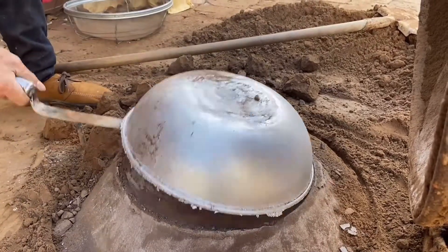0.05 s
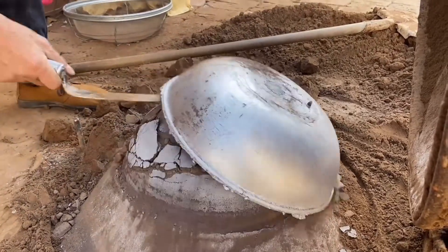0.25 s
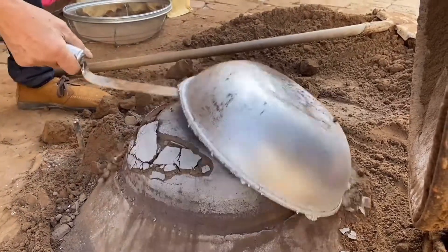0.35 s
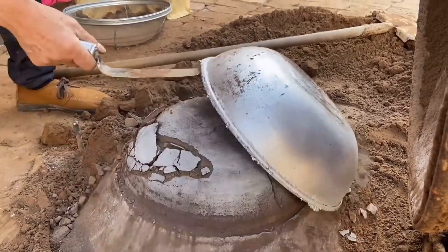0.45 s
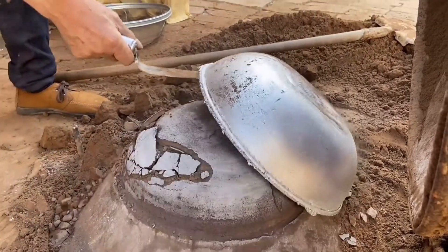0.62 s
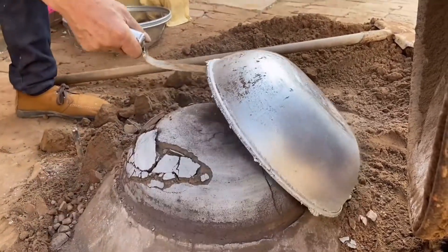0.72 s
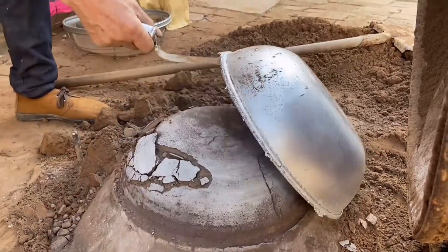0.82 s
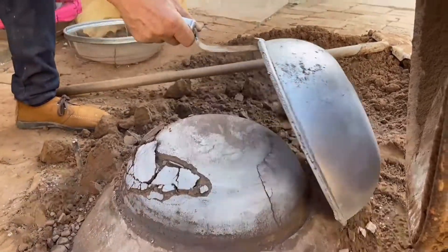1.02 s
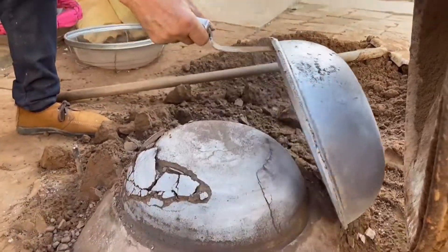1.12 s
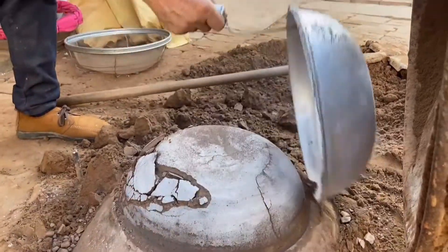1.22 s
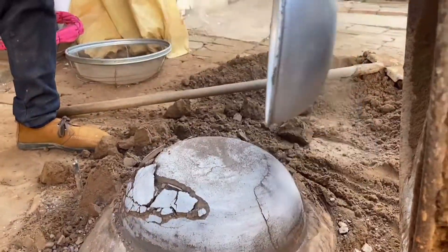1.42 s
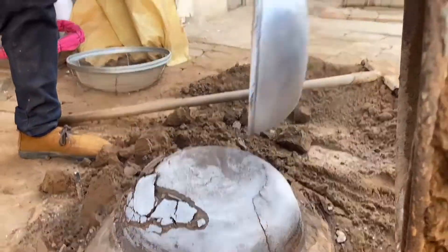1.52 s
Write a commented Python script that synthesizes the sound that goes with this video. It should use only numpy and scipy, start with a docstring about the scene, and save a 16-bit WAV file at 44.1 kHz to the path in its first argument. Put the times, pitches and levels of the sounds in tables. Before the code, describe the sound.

Metal scraping and one loud clank, then a pan grinds on grit and lifts, ringing briefly.

```python
"""Cast pan levered off its sand mould

A steel blade scrapes under the rim of a freshly cast metal pan, outdoors and close by. The pan tips
with one loud clank, knocks and grinds along the gritty mould, then lifts clear and rings more freely.
Blows and friction drive its modes; crushed sand clicks. Air buffets the microphone over a quiet yard."""
import sys
import numpy as np
from scipy import signal
from scipy.fft import rfft, irfft, next_fast_len
from scipy.io import wavfile
from scipy.ndimage import map_coordinates

SR = 44100
rng = np.random.default_rng(int(sys.argv[2]) if len(sys.argv) > 2 else 0)


def to_wav(s):
    """Save 16-bit WAV."""
    ch = np.atleast_2d(s).T  # columns
    pcm = np.round(np.clip(ch, -1, 1) * 32767)  # PCM
    wavfile.write(sys.argv[1], SR, pcm.astype(np.int16))


N = 68355

# main pan modes (frequency [Hz], level on mould [dB], t60 on mould [s], level lifted [dB])
PAN_MODES = [(326, -6, 0.25, 1), (417.7, -9.5, 0.23, -8), (471.4, -7, 0.063, -44), (812, -1, 0.079, -18),
             (958.6, 1.5, 0.32, -1), (1399.8, -6.5, 0.062, -3.5), (1892, 8, 0.077, -3),
             (2444, -7, 0.16, -5), (3074, 6, 0.07, -1.5), (3275, 8, 0.072, -7), (3450, 3, 0.18, -12),
             (3825, 3.5, 0.11, -25), (4610, 5, 0.065, -12), (5090, -5, 0.19, -21)]
# left-right likeness (frequency [Hz], correlation [-])
COHERENCE = [(60, 0.93), (500, 0.68), (950, 0.71), (1900, 0.13), (3300, 0.43), (5000, 0.52), (8000, 0.43),
             (12000, 0.65)]
RUB_SWELL_DB, RUB_SWELLS_PER_S = 3.5, 14
RING_PIVOT_HZ = 950


def amp(db):
    """Decibels to gain."""
    return 10 ** (np.asarray(db) / 20)


def unit(x):
    """Scale to rms 1."""
    return x / np.sqrt(np.mean(x ** 2) + 1e-20)


def along(points, hz):
    """Interpolate (frequency [Hz], value) points on a log axis."""
    f, v = np.transpose(points)
    return np.interp(np.log(hz + 1), np.log(f + 1), v)


def clock():
    """Sample times [s]."""
    return np.arange(N) / SR


def wobble(knots_per_s):
    """Smooth random curve."""
    knots = rng.standard_normal(int(N * knots_per_s / SR) + 4)
    return map_coordinates(knots, [clock() * knots_per_s])


def filtered(x, response):
    """Apply the gain response(hz)."""
    size = next_fast_len(N + SR // 2)
    return irfft(rfft(x, size) * response(np.fft.rfftfreq(size, 1 / SR)), size)[..., :N]


def stereo(pair, colour_db):
    """Two independent signals to coloured, partly coherent stereo, rms 1."""
    def response(hz):
        angle = np.arccos(np.clip(along(COHERENCE, hz), -1, 1)) / 2
        return amp(colour_db(hz)) * np.array([np.cos(angle), np.sin(angle)])
    mid, side = filtered(pair, response)
    return unit(np.array([mid + side, mid - side]))


def noise(spectrum):
    """Shaped stereo noise, rms 1."""
    return stereo(rng.standard_normal((2, N)), lambda hz: along(spectrum, hz))


def tone(hz, drift=0):
    """One mode, out of step between channels; drift is a fractional pitch bend."""
    apart_rad = np.arccos(np.clip(along(COHERENCE, hz), -1, 1)) * rng.choice([-1, 1])
    cycles = hz * (clock() + np.cumsum(drift) / SR) + rng.random()
    return np.sin(2 * np.pi * cycles + np.array([[apart_rad], [-apart_rad]]) / 2)


def struck(start_s, t60_s, attack_s=0.0009):
    """Impact envelope: fast attack, exponential decay."""
    age_s = np.maximum(clock() - start_s, 0)
    return (1 - np.exp(-age_s / attack_s)) * amp(-60 * age_s / t60_s)


def ringing(times_s, levels_db, t60_s):
    """Envelope of several impacts, summed in energy."""
    return np.sqrt(sum((amp(db) * struck(s, t60_s)) ** 2 for s, db in zip(times_s, levels_db)))


def air():
    """Wavering yard rumble and hiss, with low puffs of air on the microphone."""
    # yard spectrum (frequency [Hz], relative density [dB])
    yard = [(20, -36), (40, -8.5), (58, 4), (90, -6), (150, -8), (250, -17), (500, -20.5), (1200, -25.5),
            (2600, -21), (5000, -30), (8000, -35.5), (12000, -45), (16000, -44.5)]
    # air puffs (time [s], width [s], level [dB], upper edge [Hz])
    puffs = [(.09, 0.04, -40.5, 121), (0.279, 0.021, -41, 140), (0.651, 0.018, -41.5, 78.5),
             (0.738, 0.02, -39.5, 107.5), (1.183, 0.011, -32.5, 235), (1.196, 0.014, -24.5, 135),
             (1.278, 0.017, -28, 71), (1.319, 0.066, -43.5, 69.3), (1.52, 0.031, -44.5, 69)]
    low_hz = 50.3
    out = amp(-47.5 - 1.5 * wobble(8.68)) * noise(yard)
    for time_s, width_s, db, edge_hz in puffs:
        def band_db(hz):
            edges = (1 + (hz / edge_hz) ** 8) * (1 + (low_hz / (hz + 1)) ** 8)
            return -10 * np.log10(edges * (1 + hz / low_hz))
        swell = np.exp(-0.5 * ((clock() - time_s) / width_s) ** 2)
        puff = swell * stereo(rng.standard_normal((2, N)), band_db)
        out += amp(db) * unit(puff) * np.sqrt(np.mean(swell ** 2))
    return out


def grit(tilt_db_oct):
    """Sand crushed under metal: small clicks on a finer hiss."""
    # crushed sand spectrum (frequency [Hz], relative density [dB])
    spectrum = [(100, -41), (350, 3.5), (550, 0), (700, -5), (1500, -3), (2500, -9.5), (3700, -4.5),
                (5200, 2), (7000, -1), (8200, -5.5), (9300, -4.5), (12000, -8.5), (16000, -13)]
    grains_per_s, spread_db, hiss_gain = 2200, 3, 0.71
    clicks = (rng.random((2, N)) < grains_per_s / SR) * rng.choice([-1, 1], (2, N))
    sizes = amp(spread_db * np.minimum(rng.exponential(size=(2, N)), 4))
    sand = unit(clicks * sizes) + hiss_gain * rng.standard_normal((2, N))
    return stereo(sand, lambda hz: along(spectrum, hz) + tilt_db_oct * np.log2(hz / 4000 + 0.9))


def rasp(tilt_db_oct):
    """Narrow, unsteady stick-slip resonances; they bend as the contact moves."""
    # resonances of grinding metal (frequency [Hz], relative level [dB])
    resonances = [(1920, -7), (2480, -2.5), (3090, -5), (3300, 1), (3740, -1), (3920, -3), (4290, -3),
                  (4430, -11), (5140, 0), (6180, -5.5), (7680, -6), (8380, -5), (10500, -10), (12080, -9.5)]
    width_hz = 50
    drift = 0.00292 * wobble(18)

    def band(hz):
        return sum(wobble(width_hz) * tone(f, drift) for f in (hz, hz + width_hz / 2))
    return unit(sum(amp(db + tilt_db_oct * np.log2(hz / 4000)) * band(hz) for hz, db in resonances))


def rubbed(modes):
    """Friction sustains modes (frequency [Hz], level [dB]); each swells at random."""
    return unit(sum(amp(db + RUB_SWELL_DB * wobble(RUB_SWELLS_PER_S)) * tone(hz) for hz, db in modes))


def scrapes():
    """Blade and rim grind on the mould; friction favours the least damped pan modes."""
    # strokes (start [s], rise [s], hold [s], 20 dB fall [s] floored at min_fall_s,
    # grit [dB], rasp [dB], treble tilt [dB/oct], ring [dB])
    strokes = [(0.026, 0.012, 0.0097, 0.033, -34, -35, 2.5, -58),
               (0.114, 0.023, 0.04, 0.37, -52.5, -56.5, -6, -52.5),
               (0.318, 0.034, 0.0047, -0.0229, -40, -43, 3, -47),
               (0.491, 0.019, 0.0058, 0.0736, -40, -35.5, -3.5, -39.5),
               (0.54, 0.016, 0.034, -0.16, -44, -46.5, -0.5, -83),
               (0.856, 0.013, 0.069, -0.02, -55.5, -54.5, -1.5, -73),
               (0.906, 0.05, 0.0044, 0.01, -47, -45, -3, -56),
               (1.076, 0.042, 0.029, -0.04, -55.5, -59, 7.5, -61)]
    min_fall_s = 0.045
    out, t = np.zeros((2, N)), clock()
    ring = rubbed([(hz, db + 20 * np.log10(t60_s)) for hz, db, t60_s, _ in PAN_MODES])
    for start_s, rise_s, hold_s, fall_s, grit_db, rasp_db, tilt_db_oct, ring_db in strokes:
        attack = np.clip((t - start_s) / rise_s, 0, 1) ** 1.4
        release = amp(-20 * np.maximum(t - start_s - rise_s - hold_s, 0) / max(fall_s, min_fall_s))
        friction = amp(grit_db) * grit(tilt_db_oct) + amp(rasp_db) * rasp(tilt_db_oct)
        flutter = amp(2.37 * wobble(130.26))
        out += attack * release * (flutter * friction + amp(ring_db) * ring)
    return out


def squeaks():
    """The rim catches on blade and mould: brief rough notes, rising where the contact moves."""
    # rim notes (time [s], width [s], pitch [Hz], glide [oct/s], level [dB])
    notes = [(.042, 0.015, 3830, 0, -41), (.076, 0.026, 3045, 0.16, -43), (.362, 0.025, 4500, 0.25, -42),
             (.378, 0.023, 1891, 0, -47), (0.534, .022, 3290, 0, -40), (.565, 0.022, 3970, .5, -43.5),
             (.64, 0.028, 530, 0.18, -50), (.922, 0.012, 1560, 0.89, -51.5),
             (.961, 0.023, 4900, 0.11, -49.5), (1.30, 0.015, 3260, 0.75, -49),
             (1.335, 0.031, 5150, 1.2, -56), (1.345, 0.019, 4290, .8, -47), (1.365, .028, 835, 1.8, -50),
             (1.372, .012, 3750, 0.13, -49), (1.385, 0.047, 405, 2.2, -59.5)]
    out, t = np.zeros((2, N)), clock()
    for time_s, width_s, hz, glide_oct_s, db in notes:
        note = tone(hz, drift=2 ** (glide_oct_s * (t - time_s)) - 1)
        roughness = 1 + 0.5 * wobble(110)
        swell = np.exp(-0.5 * ((t - time_s) / width_s) ** 2)
        out += amp(db) * swell * roughness * note
    return out


def blows():
    """Pan hits mould: dull knock, bright clash, ringing modes; the contact point sets the colour."""
    # contacts (time [s], knock [dB], knock centre [Hz], clash [dB], ring [dB], ring tilt [dB/oct])
    contacts = [(0.0629, -48.5, 950, -49, -37, -6), (0.2179, -22, 460, -26, -32.5, 2),
                (0.2213, -18.5, 406, -19, -28, 1), (0.2253, -39, 450, -23.5, -37, -5),
                (0.232, -32, 400, -35, -28, 0.5), (0.369, -46, 330, -68, -42.5, -4.5),
                (0.449, -35, 480, -48.5, -46, -4), (0.45, -37, 410, -45.5, -46, -1.5),
                (0.496, -31.5, 540, -44.5, -48, -2), (0.511, -44, 550, -45, -49, 1.5),
                (0.53, -40.5, 565, -41.5, -75, 0), (0.865, -71, 500, -58, -63.5, 0.5),
                (0.957, -43.5, 430, -47, -52.5, -1)]
    # dull knock spectrum (frequency [Hz], relative density [dB])
    knock_spectrum = [(60, -23), (170, -6), (260, -5.5), (340, 2.5), (500, 3), (660, -6), (830, -3),
                      (1050, -2.5), (1270, -26), (1520, -5), (2100, -13.5), (5000, -32), (16000, -66)]
    # hollow modes of the pan pressed on the mould (frequency [Hz], level [dB], t60 [s])
    hollow_modes = [(355.6, -6, 0.11), (479.5, -2.5, 0.043), (546, -2.5, 0.033), (860, -4.5, 0.055),
                    (1045, -2, 0.043), (1490, 6.5, 0.042)]
    # bright clash spectrum (frequency [Hz], relative density [dB])
    clash_spectrum = [(200, -34), (1500, -5), (2650, -12), (3200, -2), (4200, 1.5), (5200, -0.5),
                      (5650, -10), (6900, 2), (8500, -16.5), (9500, -30), (11500, -9), (16000, -21)]
    # crowded upper pan modes (frequency [Hz], relative level [dB])
    upper_modes = [(2939, -51), (3415, -35), (3924, -44), (4172, -59), (4425, -48), (4823, -49),
                   (5211, -41.5), (5696, -64), (6072, -45), (6740, -44), (6918, -59), (7079, -49),
                   (7671, -70), (7989, -44), (8123, -41.5), (8387, -39.5), (8646, -46.5), (10325, -43.5),
                   (11122, -74), (11892, -73), (12543, -47.5)]
    times_s, knock_db, centre_hz, clash_db, ring_db, tilt_db_oct = np.transpose(contacts)

    knock = noise(knock_spectrum) * ringing(times_s, knock_db + 0.5, t60_s=0.087)
    for hz, db, t60_s in hollow_modes:
        off_centre_db = 6.5 * np.abs(np.log2(hz / centre_hz))
        knock += tone(hz) * ringing(times_s, knock_db + 1 + db - off_centre_db, t60_s)

    crack = ringing(times_s, clash_db + 5, t60_s=0.024)
    clash = noise(clash_spectrum) * (crack + ringing(times_s, clash_db, t60_s=0.13))
    shimmer = unit(sum(amp(db) * tone(hz) for hz, db in upper_modes))
    shimmer *= ringing(times_s, clash_db + 1, t60_s=0.082)

    ring = np.zeros((2, N))
    for hz, db, t60_s, _ in PAN_MODES:
        treble_db = tilt_db_oct * max(np.log2(hz / RING_PIVOT_HZ), 0)
        ring += tone(hz) * ringing(times_s, ring_db + db + treble_db, t60_s)
    return knock + clash + shimmer + ring


def clink():
    """The blade chatters off the rim in quick, bright, gritty contacts."""
    # steel blade modes (frequency [Hz], level [dB], t60 [s])
    blade_modes = [(3840, 7, 0.054), (3930, -1, 0.042), (4170, 1, .05), (4320, -2, 0.1), (4800, -5, .04),
                   (5556, -6, .07), (6500, -17, 0.032), (7200, -2, .06), (9500, -13, 0.025),
                   (12100, 0, 0.043), (14700, -11, .03)]
    # blade contacts (time [s], level [dB])
    contacts = [(1.23, -40.5), (1.2365, -39.5), (1.242, -43.5)]
    times_s, hit_db = np.transpose(contacts)
    steel = sum(tone(hz) * ringing(times_s, hit_db + db, t60_s) for hz, db, t60_s in blade_modes)
    return steel + grit(tilt_db_oct=4) * ringing(times_s, hit_db + 8, t60_s=0.04)


def lift():
    """The pan flicks free and rings; its sliding rim rubs mainly high modes first, then low ones."""
    # rim slide (time [s], friction noise [dB], high modes [dB], low modes [dB])
    slide = [(1.22, -82, -80, -79), (1.258, -52, -50.5, -51), (1.31, -48.5, -49.5, -59),
             (1.365, -44, -53.5, -52.5), (1.42, -49.5, -55, -46.5), (1.456, -71, -57.5, -46.5),
             (1.49, -91, -70, -63), (1.55, -69, -82, -63)]
    split_hz = 1200
    times_s, *levels_db = np.transpose(slide)
    friction, rub_high, rub_low = (amp(np.interp(clock(), times_s, db)) for db in levels_db)
    flick = amp(-40) * struck(start_s=1.231, t60_s=0.19)
    ring = np.zeros((2, N))
    for hz, _, _, lifted_db in PAN_MODES:
        flick_share = min(hz / RING_PIVOT_HZ, RING_PIVOT_HZ / hz)
        drive = np.hypot(flick * flick_share, rub_high if hz > split_hz else rub_low)
        swell_db = RUB_SWELL_DB / 2 * wobble(RUB_SWELLS_PER_S)
        ring += amp(lifted_db + swell_db) * tone(hz) * drive
    return ring + friction * (grit(tilt_db_oct=-0.31) + amp(-3.5) * rasp(tilt_db_oct=0))


def scene():
    """Pan slightly left, faint yard echo, air."""
    # pan balance (frequency [Hz], left over right [dB])
    balance = [(500, 0.5), (1200, 1), (3000, 2), (5500, 3), (8000, 0)]
    echo_db = -21.5
    pan = blows() + scrapes() + squeaks() + clink() + lift()
    pan = filtered(pan, lambda hz: amp(along(balance, hz) * np.array([[0.5], [-0.5]])))
    tail = rng.standard_normal((2, N)) * struck(start_s=0.0067, t60_s=0.61)
    echo = signal.fftconvolve(pan, tail / np.linalg.norm(tail[0]), axes=1)[:, :N]
    return pan + amp(echo_db) * echo + air()


def record(dry):
    """Steep low-pass band limit."""
    top_hz = 16200
    return filtered(dry, lambda hz: 1 / np.sqrt(1 + (hz / top_hz) ** 160))


dry = scene()
out = record(dry)
to_wav(out)
```